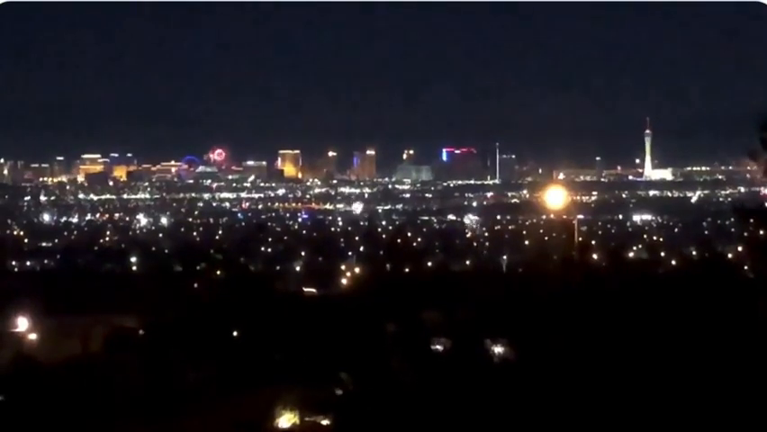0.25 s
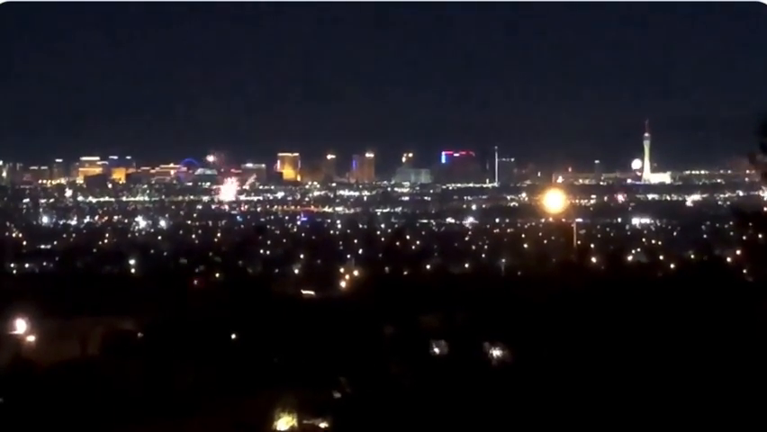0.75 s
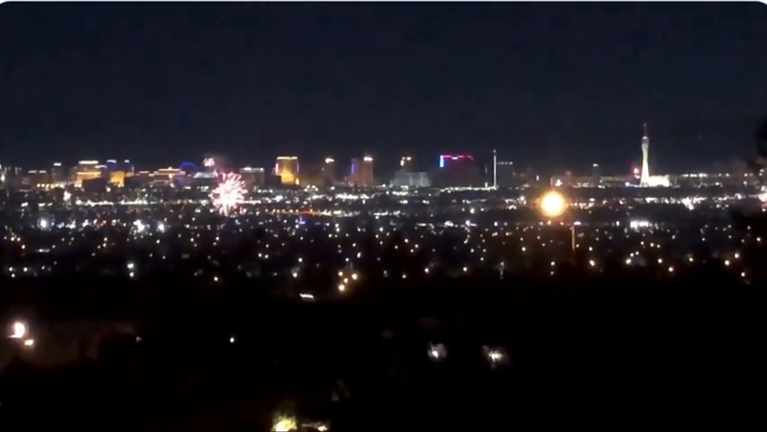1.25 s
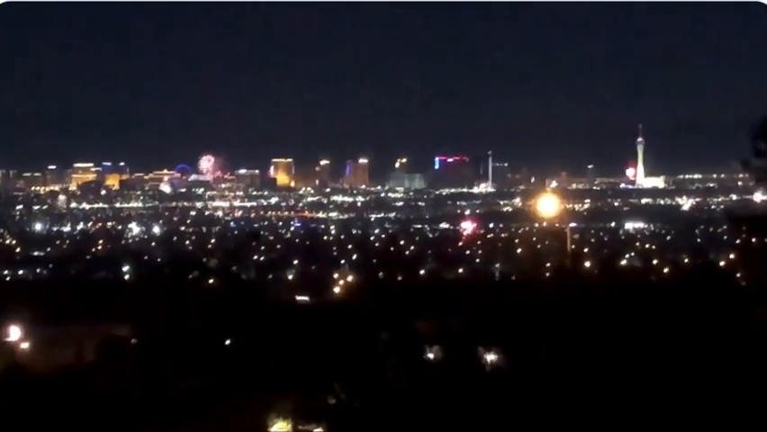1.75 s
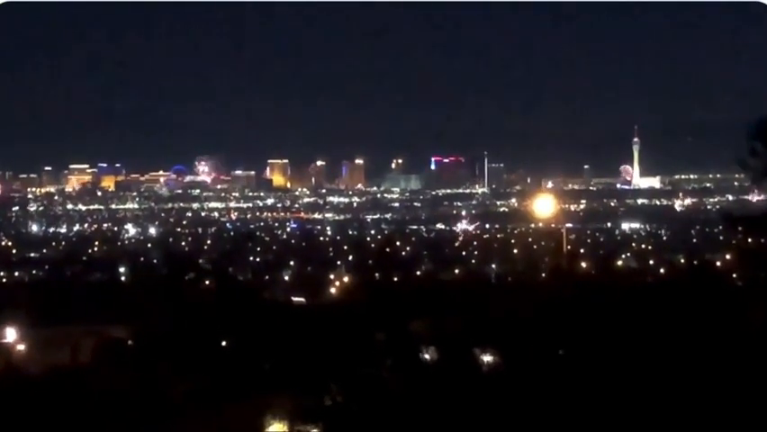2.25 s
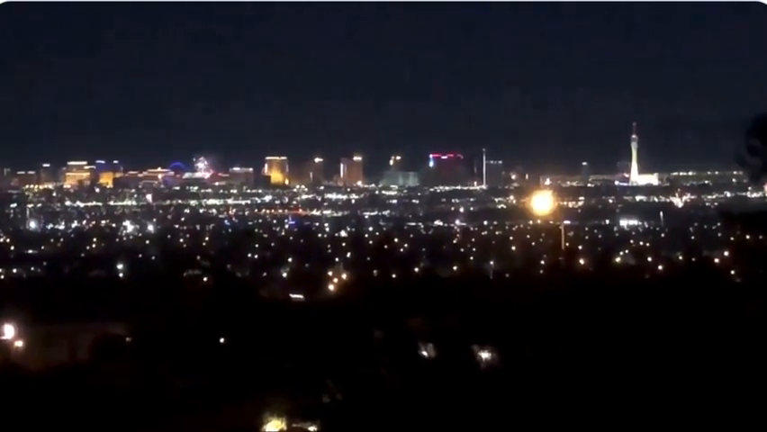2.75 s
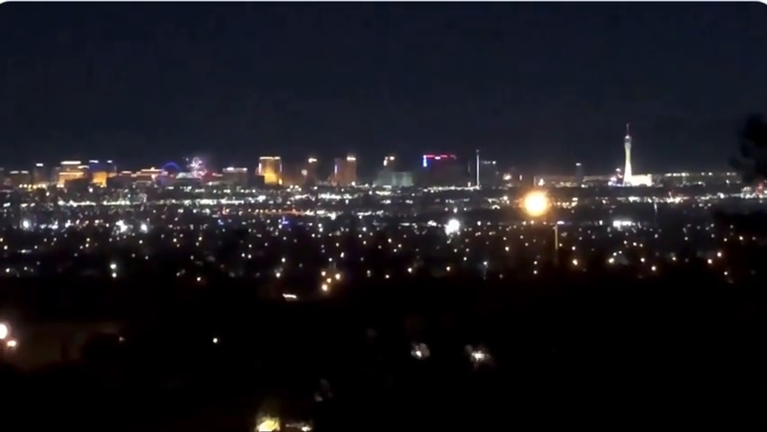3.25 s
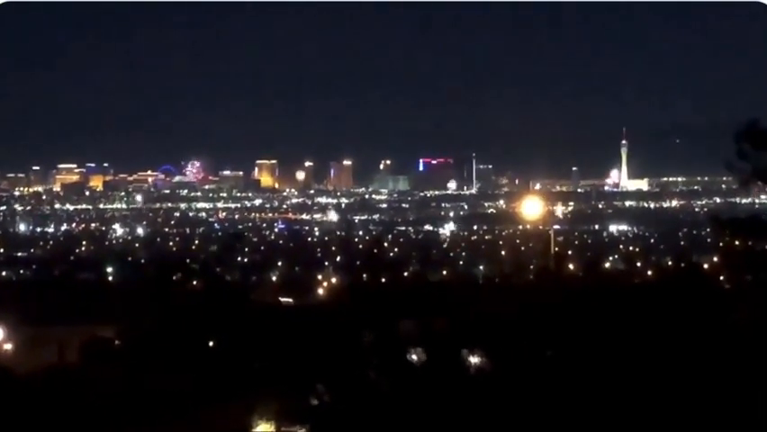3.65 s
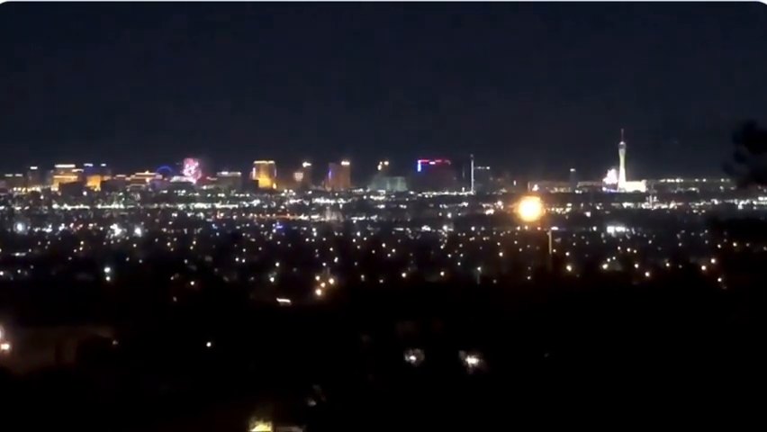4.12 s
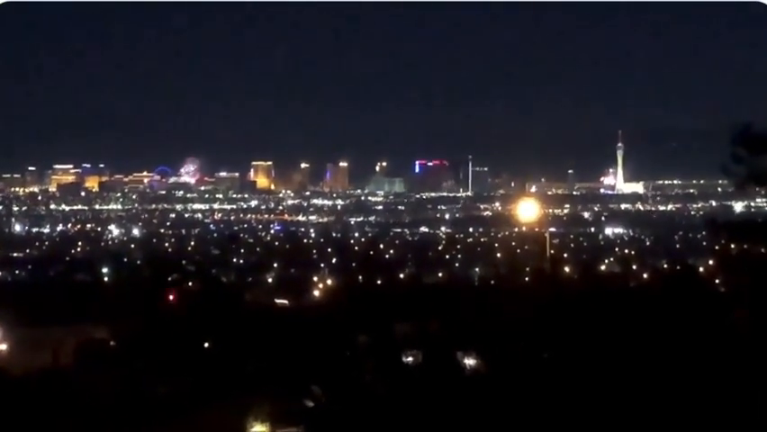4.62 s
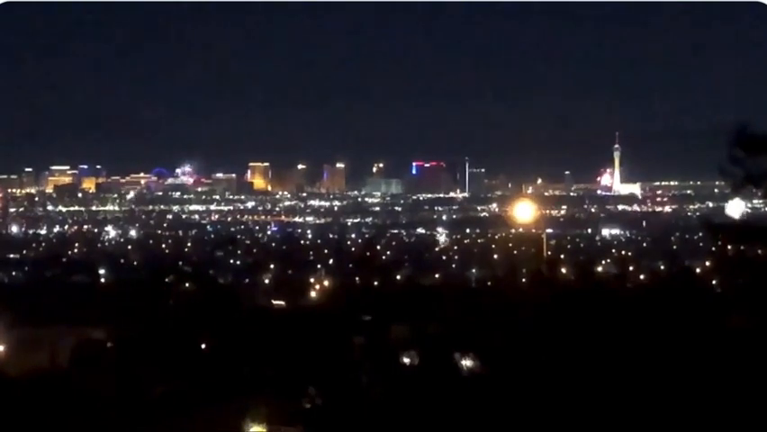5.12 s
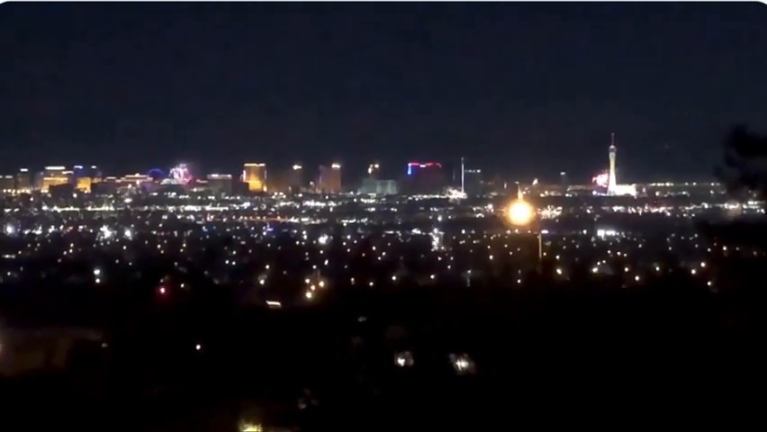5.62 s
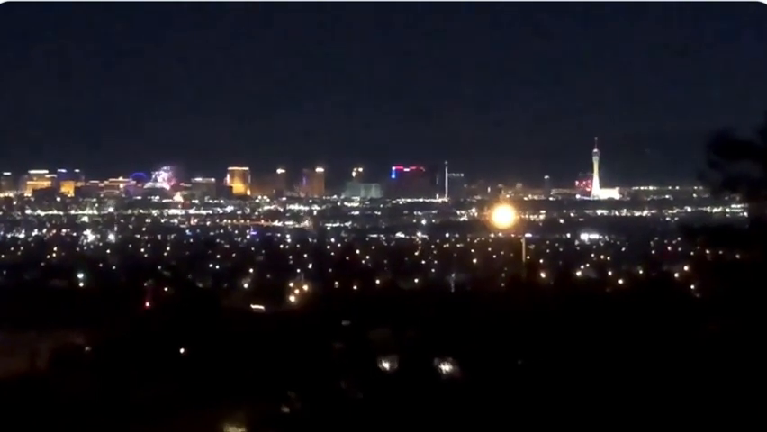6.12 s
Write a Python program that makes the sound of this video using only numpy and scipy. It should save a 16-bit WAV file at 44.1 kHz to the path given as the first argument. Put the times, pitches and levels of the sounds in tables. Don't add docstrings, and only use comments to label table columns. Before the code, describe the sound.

From a dark hillside above a city, a hand-held microphone hears a steady low rumble of countless far fireworks. A near shell bangs almost at once and the slope roars back briefly. A faint falling whistle and soft crackle follow, then two loud bangs in quick succession. Scattered duller thuds and pops continue, one stronger past the middle, while a faint cricket chirps and the casing ticks.

```python
import sys
import numpy as np
from scipy import signal
from scipy.fft import rfft, irfft
from scipy.io import wavfile
from scipy.ndimage import uniform_filter1d, minimum_filter1d

SR = 44100
rng = np.random.default_rng(int(sys.argv[2]) if len(sys.argv) > 2 else 0)


def unload_wav(signal):
    wavfile.write(
        sys.argv[1],
        SR,
        np.round(np.clip(np.atleast_2d(signal).T, -1, 1) * 32767).astype(np.int16),
    )


def boost(x):
    u = np.asarray(x, float) / 20
    return 10 ** u


N = 280917

# (time [s], peak [dB], body [Hz], brightness [dB], slope bounce delay [ms])
CLOSE_BURSTS = [
    (0.3047, 3.5, 266, 15, .665),
    (1.4804, 0.5, 313, 11.5, 0.29),
    (1.6058, 3.5, 335, 6.5, 0.16),
]
# (time [s], peak [dB], body [Hz], brightness [dB], scatter [dB])
NEAR_BURSTS = [
    (1.306, -11, 422, 6, -3.5),
    (1.437, -13, 263, 6, -8),
    (3.619, -2, 273, 5, -7),
    (4.147, -12.5, 450, 2, -9.5),
    (4.182, -14, 634, 0.5, -2.5),
    (4.463, -11.5, 228, 1, -2),
    (5.138, -9, 557, 1, -6.5),
    (5.789, -9.5, 780, 6.5, -7),
]
# (time [s], peak [dB], body [Hz], scatter [dB])
SNAPS = [(0.11, -28.5, 1120, -4), (1.913, -19.5, 630, 4), (2.496, -25.5, 580, -4), (2.52, -22, 850, 2),
         (3.114, -21.5, 560, 4), (3.522, -32, 800, -3), (3.796, -21.5, 696, -20), (3.915, -22, 586, -3),
         (3.96, -21.5, 700, 5), (5.298, -20, 593, 4), (5.915, -17.5, 685, 3.5)]
# (time [s], peak [dB],
# body [Hz], brightness [dB], scatter [dB])
BROKEN_FRONTS = [(0.317, -3, 163, 5.5, -7.5), (0.331, -3, 232, 7.5, 0), (0.346, -6, 231, 3.5, 1),
                 (0.363, -6.5, 314, 6.5, 0), (0.389, -15, 157, 12, -1), (0.416, -6.5, 204, 2.5, -4.5),
                 (0.434, -14.5, 300, 5.5, 0.5), (0.99, -25, 161, 8, 8), (1.321, -18.5, 315, 11, -9),
                 (1.495, -10, 283, 9, -6.5), (1.517, -12.5, 270, 8.5, -6), (1.539, -28.5, 288, 10.5, 3),
                 (1.621, -9.5, 297, 9, -6), (1.639, -12, 282, 5, -11), (3.635, -11, 263, 8.5, -8),
                 (5.824, -9, 850, 6, -6.5)]
# (time [s], peak [dB], body [Hz], brightness [dB], scatter [dB])
CRACKS = [
    (0.417, -21.5, 1500, 16, -13),
    (.988, -38, 1500, 10.5, 20.5),
    (1.493, -25, 1900, 6, 6.5),
    (4.689, -26, 1230, 7.5, 9.5),
    (4.731, -29, 1400, 6, 5.5),
    (5.232, -35, 1190, 8, -5),
    (5.827, -23.5, 1500, 6, 7.5),
]
# (time [s], peak [dB], body [Hz])
OPEN_THUDS = [(.12, -30.5, 315), (.607, -18, 315), (.828, -28, 320), (1.397, -20, 203), (1.825, -24, 235),
              (1.91, -29, 235), (2.088, -27, 383), (2.449, -26, 147), (2.801, -28, 205), (2.861, -30, 173),
              (3.698, -19, 275), (3.849, -35, 283), (5.44, -23, 316), (5.841, -16.5, 230)]
# (time [s], peak [dB], body [Hz])
HOUSE_BOOMS = [(.057, -44, 282), (.767, -20, 318), (1.027, -21.5, 123), (1.684, -17.5, 282),
               (2.196, -17.5, 205), (2.249, -29, 113), (2.694, -24.5, 207), (3.067, -24, 158),
               (3.109, -19.5, 231), (3.514, -24.5, 234), (3.932, -14.5, 130), (4.379, -18.5, 207),
               (4.627, -18, 172), (5.019, -24, 300), (5.577, -19.5, 286), (5.69, -30, 315),
               (5.925, -18.5, 242), (6.148, -30, 665)]
# (time [s], peak [dB], body [Hz])
HIDDEN_ROLLS = [(.202, -32, 250), (.558, -23.5, 303), (.902, -28.5, 362), (1.809, -18.5, 315),
                (2.606, -23, 196), (3.018, -19, 108), (3.326, -26.5, 284), (3.435, -25.5, 223),
                (4.251, -25.5, 254), (4.569, -25, 212), (5.388, -24, 253), (6.319, -29, 216)]
# (time [s], level [dB])
ROAR_LEVEL = [
    (0.314, -28),
    (0.316, -30),
    (0.346, -29),
    (0.416, -37),
    (0.42, -33),
    (0.48, -45),
    (0.56, -56),
]
# (frequency [Hz], density [dB per Hz])
ROAR_SPECTRUM = [(530, -31), (900, -16), (1210, 1), (1470, -5.5), (1800, -2), (2040, -9), (2970, -15.5),
                 (7710, -48.5), (9000, -51), (11700, -73), (19800, -120)]
# (time [s], frequency [Hz], level [dB])
WHISTLE_TRACK = [
    (.712, 1360, -47),
    (.742, 1315, -44),
    (.76, 1245, -45),
    (.78, 1200, -44),
    (.812, 1155, -49),
]
# (time [s], level [dB], hold [s], fall [dB/s])
SHELL_STARS = [
    (-.04, -55, .01, 122),
    (.3, -44.5, 0.27, 16.5),
    (0.993, -37.5, 0.22, 50.5),
    (1.5, -51, .1, 18),
    (3.2, -67, 0.046, 60),
    (3.66, -52, 0.017, 130),
    (4.75, -63.5, 0.4, 14),
    (5.72, -56, 0.66, 5),
]
# (frequency [Hz], density [dB per Hz])
CRACKLE_SPECTRUM = [(290, -39.5), (500, 1), (757, -2), (1260, -0.5), (1360, -1), (1500, -4.5), (1720, -7.5),
                    (1870, -10.5), (2780, -21), (5000, -48), (6500, -70.5), (11000, -120)]
# (time [s], chirps [count], period [s], peak [dB])
CRICKET_RUNS = [
    (1.274, 2, .162, -61),
    (1.7475, 5, .1035, -60),
    (2.2588, 5, .0963, -57),
    (2.7478, 4, .098, -54),
    (3.2066, 8, .0975, -56),
    (3.985, 6, .0977, -55),
    (4.6548, 1, .1, -53),
    (4.7585, 10, .0979, -53),
    (5.7385, 7, .0967, -51),
]
# (time [s], peak [dB])
CASING_TICKS = [(0.057, -61), (0.113, -60), (0.2558, -57), (0.3325, -59), (0.5525, -52), (0.674, -55),
                (0.7861, -62), (0.966, -62), (1.4816, -60), (1.605, -60), (1.7524, -62), (1.859, -55.5),
                (2.1151, -62), (2.2453, -58), (2.3087, -58), (2.9033, -85), (3.1773, -54), (3.6717, -61),
                (3.8595, -60), (3.932, -61), (4.3485, -61), (4.513, -58), (4.798, -60), (4.924, -55),
                (5.1085, -56), (5.284, -56.5), (5.462, -75), (5.6082, -60), (5.8823, -56), (6.2846, -64)]
# (time [s], peak [dB], resonance [Hz], t60 [s])
CASING_KNOCKS = [(1.7755, -45.5, 2460, 0.046), (1.8616, -61, 3000, 0.05), (2.1128, -54, 3300, 0.04),
                 (2.2416, -52, 2580, 0.037), (2.9733, -58, 3440, 0.11), (3.1794, -84, 2700, 0.05),
                 (3.732, -49, 2990, 0.054), (3.821, -54, 2590, 0.075), (3.932, -61, 2730, 0.096),
                 (4.1317, -56, 2870, 0.088), (4.5103, -63, 2760, 0.05), (5.109, -49, 2500, 0.089)]
# (time [s], level [dB])
RUMBLE_LEVEL = [(0, -34.5), (.24, -35), (.5, -27), (.6, -35), (.79, -34.5), (.95, -36), (1.6, -33.5),
                (2.0, -35), (2.5, -39.5), (3.08, -34), (3.3, -38.5), (3.9, -30), (4.24, -38.5),
                (4.62, -31.5), (4.9, -37.5), (5.75, -38.5), (5.97, -36), (6.37, -35.5)]
# (frequency [Hz], density [dB per Hz])
RUMBLE_SPECTRUM = [(13, -86), (22, -82.5), (49, -6.5), (144, -3.5), (202, -2.5), (242, -2.5), (300, -3),
                   (325, -1), (438, -12.5), (613, -9.5), (2500, -45), (3250, -55), (5500, -120)]
# (frequency [Hz], density [dB per Hz])
HISS_SPECTRUM = [(1060, -41), (1800, -0.5), (2440, -6.5), (2940, -2), (6900, -11), (7860, -8.5),
                 (8460, -9.5), (15200, -21), (16000, -17), (16500, -67.5)]


def rms_one(x):
    return x / np.sqrt(np.mean(x ** 2, axis=-1, keepdims=True) + 1e-20)


def in_time(rows):
    time_s, *columns = np.transpose(rows)
    return [np.interp(np.arange(N) / SR, time_s, column) for column in columns]


def drift(rate_hz):
    pole = np.exp(-2 * np.pi * rate_hz * 40 / SR)
    noise = rng.standard_normal(N // 40 + 2002)
    slow = signal.lfilter([1], [1, -2 * pole, pole ** 2], noise)[2000:]
    return np.interp(np.arange(N) / 40, np.arange(len(slow)), rms_one(slow))


def coloured(x, spectrum):
    hz = np.fft.rfftfreq(N, 1 / SR) + 1
    point_hz, point_db = np.transpose(spectrum)
    level_db = np.interp(np.log(hz), np.log(point_hz), point_db)
    return rms_one(irfft(rfft(x) * boost(level_db), N))


def bandpass(x, low_hz, high_hz):
    return signal.sosfilt(signal.butter(2, [low_hz, high_hz], "band", fs=SR, output="sos"), x)


def pops(shape, per_s, spread_db):
    size_db = spread_db * np.minimum(rng.exponential(1, shape), 4)
    sizes = boost(size_db) * rng.choice([-1, 1], shape)
    return sizes * (rng.random(shape) < per_s / SR)


def add(out, times_s, sounds):
    for time_s, sound in zip(times_s, sounds):
        at = max(round(time_s * SR), 0)
        out[at:at + len(sound)] += sound[:N - at]
    return out


def all_bursts():
    rows = [(*row[:-1], -12, 0.38) for row in CLOSE_BURSTS]
    rows += [(*row, 0.36) for row in NEAR_BURSTS]
    rows += [(s, db, hz, 4.5, scatter_db, 0.14) for s, db, hz, scatter_db in SNAPS]
    rows += [(*row, 0.37) for row in BROKEN_FRONTS]
    rows += [(*row, 0.11) for row in CRACKS]
    for far, scatter_db, t60_s in [(OPEN_THUDS, -6, 0.22), (HOUSE_BOOMS, -1, 0.36), (HIDDEN_ROLLS, 8, 0.2)]:
        rows += [(*row, 2, scatter_db, t60_s) for row in far]
    return np.array(rows)


def burst_path(hz, body_hz, bright_db):
    x = 1j * hz / body_hz
    body = x / (1.4 + x + 1.4 * x * x) * x / (0.67 + x)
    air = (1 + 1j * hz / (1104 * boost(bright_db))) ** -10
    ground_lag_s = np.clip(0.3 / body_hz, .0003, .0013)
    ground = 1 + boost(-8.5) * np.exp(-2j * np.pi * hz * ground_lag_s)
    late_bass = np.exp(-2j * np.pi * 1.1 * np.log(1 + hz / 37.9))
    path = body * air * ground * late_bass
    bounce_s = np.array(CLOSE_BURSTS)[:, -1:] / 1000
    treble = 1 / (1 + (1100 / (hz + 1)) ** 4)
    path[:len(CLOSE_BURSTS)] *= 1 + boost(-4) * treble * np.exp(-2j * np.pi * hz * bounce_s)
    return path


def direct_sound(path, t, size):
    broken_s = .0025
    fronts = rng.standard_normal((len(path), size)) * t / broken_s * np.exp(-t / broken_s)
    clean = len(CLOSE_BURSTS) + len(NEAR_BURSTS) + len(SNAPS)
    fronts[:clean] = 0.065 * fronts[:clean] + (t == 0)
    direct = irfft(rfft(fronts) * path, size)
    return direct / np.abs(direct).max(axis=1, keepdims=True)


def town_scatter(path, t, t60_s, size):
    walls = rms_one(pops((len(path), size), 2500, spread_db=1.0))
    walls *= np.clip(t / 0.0095 - .4, 0, 1) * (t < .6)
    hz = np.fft.rfftfreq(size, 1 / SR)
    dull = rfft(walls * boost(-60 * t / t60_s)) / (1 + 1j * hz / 900)
    bright = rfft(walls * boost(-60 * t / (t60_s * 0.97)))
    path_rms = np.sqrt(np.mean(np.abs(path) ** 2, axis=1, keepdims=True))
    return irfft((dull + bright) * path, size) / path_rms


def bursts():
    size = 2 ** 15
    time_s, peak_db, body_hz, bright_db, scatter_db, t60_s = all_bursts().T[:, :, None]
    t = np.arange(size) / SR
    path = burst_path(np.fft.rfftfreq(size, 1 / SR), body_hz, bright_db)
    direct = direct_sound(path, t, size)
    scatter = town_scatter(path, t, t60_s, size)
    front_s = np.argmax(np.abs(direct[:, :size // 2]) > .25, axis=1) / SR
    sounds = boost(peak_db - 5.0) * (direct + boost(scatter_db) * 0.19 * scatter)
    out = add(np.zeros(N), time_s[:, 0] - front_s + 0.002427, sounds)
    return signal.sosfilt(signal.butter(2, 53, "high", fs=SR, output="sos"), out)


def roar():
    level_db, = in_time(ROAR_LEVEL)
    t = np.arange(N) / SR
    fade_in = (t - ROAR_LEVEL[0][0]) / 0.01
    fade_out = (ROAR_LEVEL[-1][0] - t) / 0.027
    gate = np.clip(np.minimum(fade_in, fade_out), 0, 1)
    return boost(level_db + 1.0) * gate * coloured(pops(N, 9000, spread_db=3.0), ROAR_SPECTRUM)


def whistle():
    hz, level_db = in_time(WHISTLE_TRACK)
    t = np.arange(N) / SR
    edge_s = np.minimum(t - WHISTLE_TRACK[0][0], WHISTLE_TRACK[-1][0] - t)
    gate = np.clip(edge_s / 0.023, 0, 1)
    tone = np.sqrt(2) * np.sin(2 * np.pi * np.cumsum(hz) / SR)
    return boost(level_db + 1.7 * drift(34)) * gate * tone


def stars_db():
    time_s, level_db, hold_s, fall_db_per_s = np.array(SHELL_STARS).T[:, :, None]
    rise_s, floor_db = 0.054, -65.5
    clock_s = np.arange(0, N / SR + .002, .002)
    t = clock_s - time_s
    fall_db = fall_db_per_s * np.maximum(t - rise_s - hold_s, 0)
    gain = np.clip(t / rise_s, 0, 1) * boost(level_db - fall_db)
    power = np.sum(gain ** 2, axis=0) + boost(2 * floor_db)
    return in_time(np.c_[clock_s, 10 * np.log10(power)])[0]


def star_crackle():
    level_db = stars_db()
    grain = coloured(pops(N, 3000, spread_db=2.5), CRACKLE_SPECTRUM)
    crackle = boost(level_db - 2.0 + 0.86 * drift(60)) * grain
    sparks_db = -4.5 + 1.9 * (level_db + 35)
    return crackle + boost(sparks_db) * bandpass(crackle, 1500, 3300)


def cricket():
    chirps = [(s + k * period_s, db) for s, count, period_s, db in CRICKET_RUNS for k in range(round(count))]
    time_s, peak_db = np.transpose(chirps)
    t = np.arange(600) / SR - .006
    stroke = np.exp(-.5 * (t / 0.0022) ** 2) * np.sin(2 * np.pi * (7750 * t - 250 * t * t / 0.011))
    gap_luck, second_luck, chirp_luck = rng.normal(0, 1, (3, len(time_s)))
    peak_db = peak_db + 0.7 * chirp_luck
    first_s = time_s - .003
    second_s = first_s + .0165 + 0.00043 * gap_luck
    out = add(np.zeros(N), first_s, boost(peak_db - 10.5)[:, None] * stroke)
    return add(out, second_s, boost(peak_db - 8.5 + 1.5 * second_luck)[:, None] * stroke)


def casing():
    t = np.arange(6000) / SR
    time_s, peak_db = np.array(CASING_TICKS).T[:, :, None]
    decay = boost(peak_db - 2.0 - 60 * t / 0.074) * np.minimum(t / 0.0013, 1)
    noise = rng.standard_normal((len(time_s), len(t))) * decay
    out = add(np.zeros(N), time_s[:, 0], bandpass(noise, 4000, 12000))
    for knock_s, knock_db, hz, t60_s in CASING_KNOCKS:
        ring = rms_one(bandpass(rng.standard_normal(len(t)), hz / 1.31, hz * 1.31))
        add(out, [knock_s], [ring * boost(knock_db - 5 - 60 * t / t60_s)])
    return out


def town_rumble():
    level_db, = in_time(RUMBLE_LEVEL)
    far = rms_one(pops(N, 250, spread_db=3.5)) * 0.77 + rng.standard_normal(N)
    return boost(level_db - 4.5 + 1.9 * drift(5.9)) * coloured(far, RUMBLE_SPECTRUM)


def air_hiss():
    level_db = -69.5 + 2.0 * drift(35) + 0.51 * drift(19)
    return boost(level_db) * coloured(rng.standard_normal(N), HISS_SPECTRUM)


def scene():
    fireworks = bursts() + roar() + whistle() + star_crackle()
    close_by = cricket() + casing()
    background = town_rumble() + air_hiss()
    return (fireworks + close_by + background)[None]


def low_pass(x):
    return signal.sosfilt(signal.butter(12, 16800, fs=SR, output="sos"), x)


def record(dry):
    window = 89
    gain = minimum_filter1d(np.minimum(1, .63 / (np.abs(dry) + 1e-9)), size=window)
    limited = dry * uniform_filter1d(gain, size=window)
    mix = signal.sosfilt(signal.ellip(10, .3, 55, 15800, fs=SR, output="sos"), limited)
    return low_pass(mix)


dry = scene()
out = record(dry)
unload_wav(out)
```